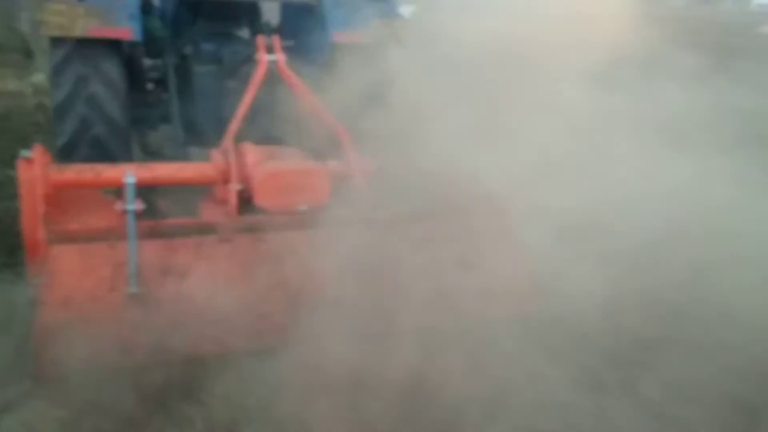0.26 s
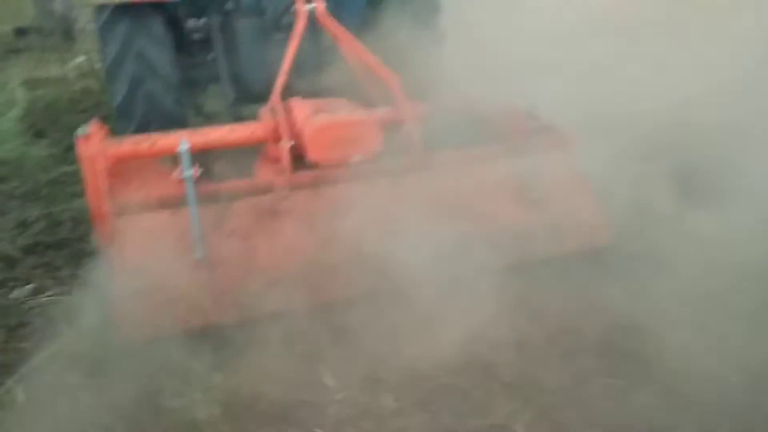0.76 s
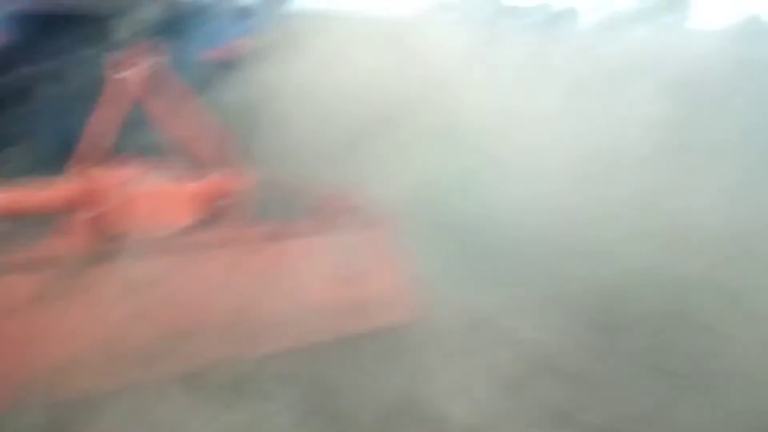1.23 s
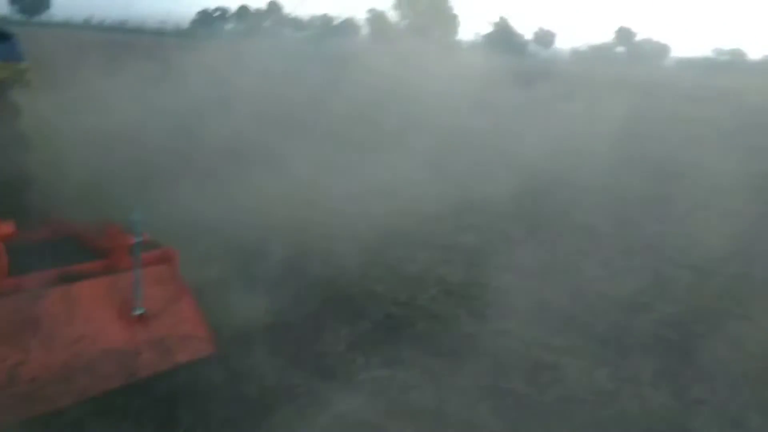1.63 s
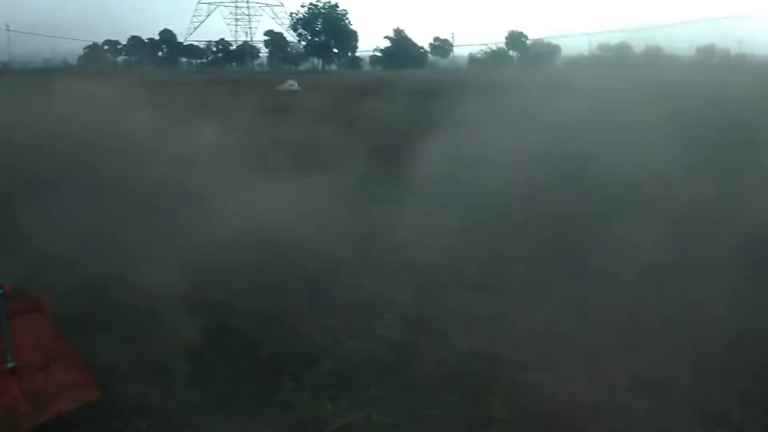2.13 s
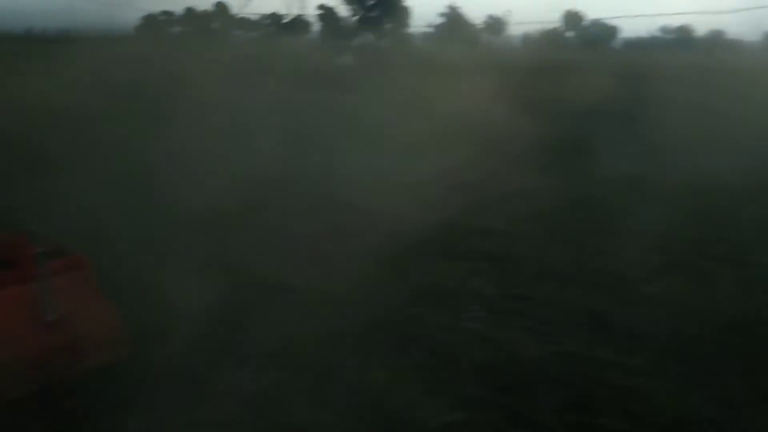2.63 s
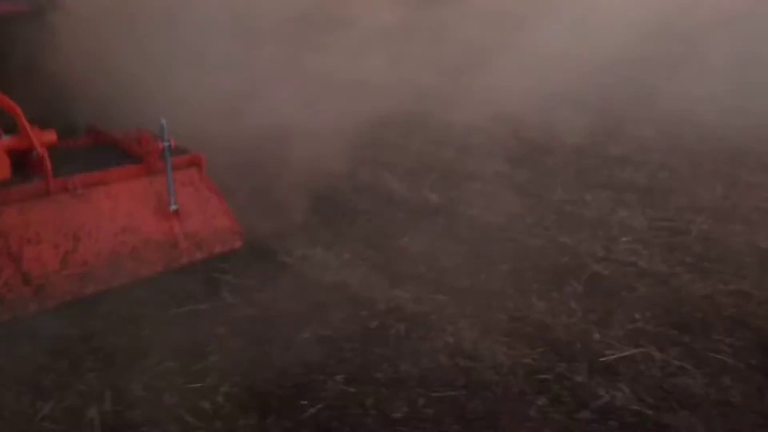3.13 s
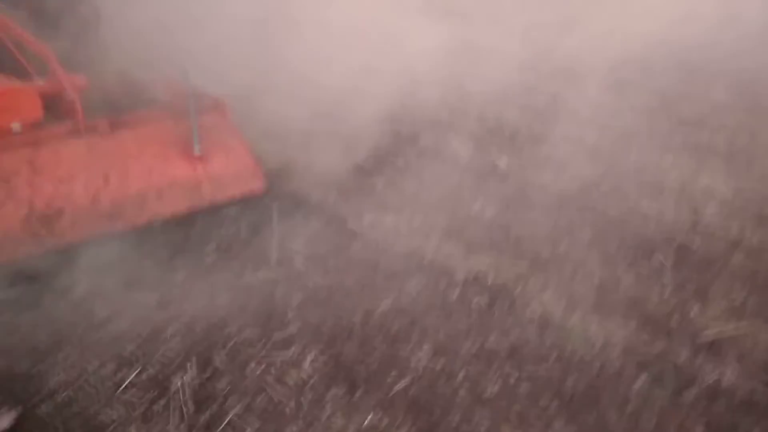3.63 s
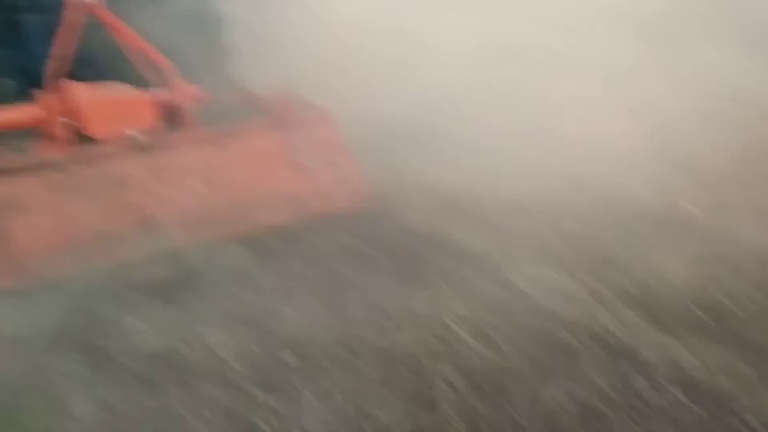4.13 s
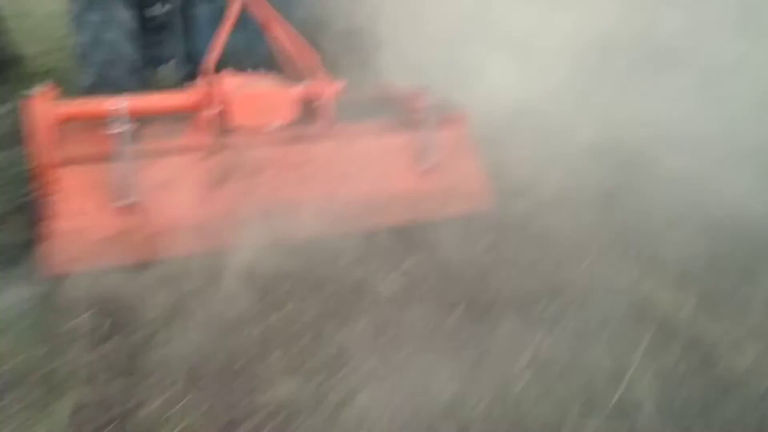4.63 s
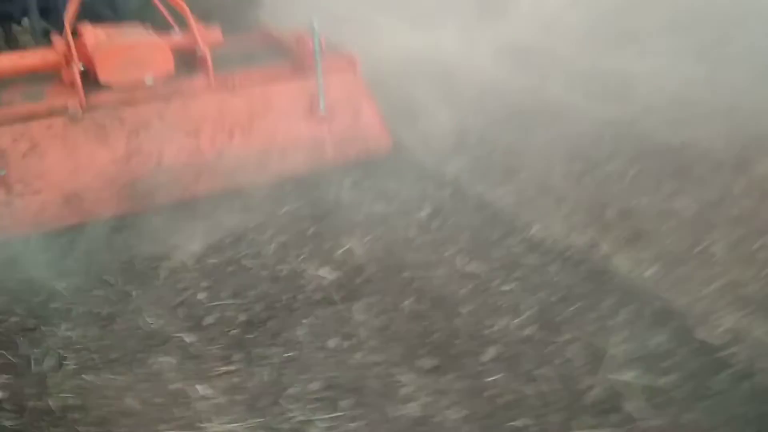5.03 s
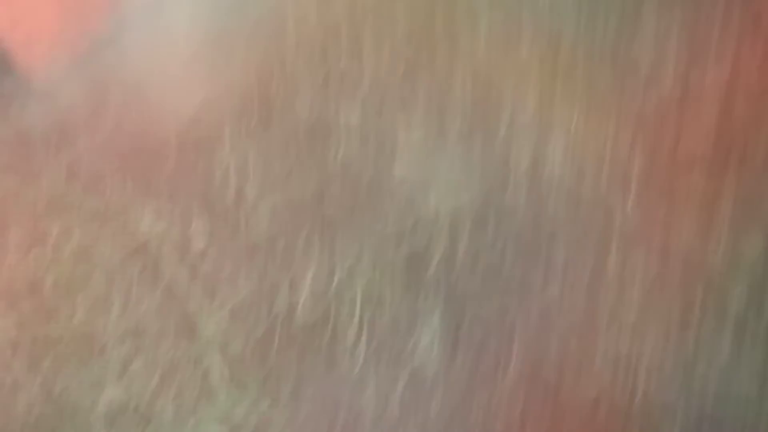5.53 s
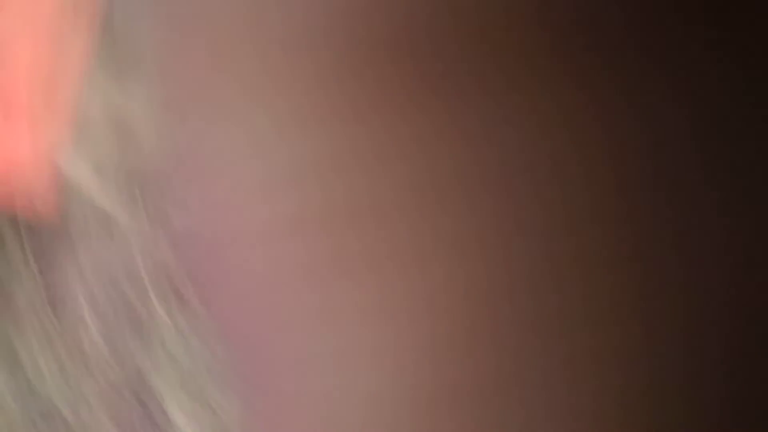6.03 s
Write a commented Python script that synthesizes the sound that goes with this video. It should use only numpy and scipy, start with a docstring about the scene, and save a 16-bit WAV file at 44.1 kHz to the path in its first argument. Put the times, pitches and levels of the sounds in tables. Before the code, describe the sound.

A tractor-drawn tiller works dry soil in an open field, heard from close behind on a wind-exposed stereo phone. Throughout, an uneven low diesel drone lies under rough churning earth, with irregular hissing showers of grit and fine dust. From 0 to 0.7 s the machine is fairly clear, with several clods knocking the steel hood and bright pebble clicks near 0.45 s. Gusts begin around 0.7 s, with more clanks to 1.15 s. From 1.5 to 2.6 s wind hits hardest, mostly left: deep thumps, distorted rumble, flutter and ragged pops, with metallic clanks and snaps at 2.06-2.25, 2.5 and 2.7 s. It dips near 3 s, then buffets again from 3.2 to 4.2 s. Straw rustles left from 4.3 to 5.4 s, amid short gusts near 4.9-5.25 s. Afterwards it is calmer, with dull knocks at 5.3-5.4 s, a bright stone snap at 5.8 s, clicks, and a closing gust at 6.25 s.

```python
"""A tractor's rotary tiller works dry soil in an open, windy field, a phone carried close behind it.
The tines fling bursts of grit and dust noise, pebbles click, and clods and stones ring the steel hood's
resonances. The diesel's uneven firing pulses drone under churning ground, and dry straw rustles close by.
Gusts buffet the two microphone ports, the left one most: filtered noise for the turbulence,
gliding purrs for eddies in step, single swings for big ones and ragged pops for slaps."""
import sys
import numpy as np
from scipy import signal
from scipy.fft import rfft, irfft
from scipy.io import wavfile
from scipy.ndimage import uniform_filter1d, map_coordinates

SR = 44100
rng = np.random.default_rng(int(sys.argv[2]) if len(sys.argv) > 2 else 0)


def transcribe(signal):
    """Save signal, clipped to [-1, 1], as a 16-bit WAV file at the path in sys.argv[1]."""
    frames = np.atleast_2d(signal).T
    limited = np.clip(frames, -1, 1)
    pcm = np.round(limited * 32767).astype(np.int16)
    wavfile.write(sys.argv[1], SR, pcm)


N = 276507

# sharp slaps of wind on the left port: (time [s], level before a 1.5 dB cut [dB])
SLAP_EVENTS = [(0.749, -17.5), (1.301, -17), (1.353, -11), (1.513, -10), (1.531, -16), (1.572, -17),
               (1.608, -8), (1.62, -1.5), (1.636, -2), (1.656, -10), (1.664, -12), (1.677, 3),
               (1.795, -4.5), (1.866, -0.5), (1.885, -9), (1.98, -7), (1.992, -9), (2.275, -12),
               (2.361, -7), (2.39, -9), (2.397, -3.5), (2.409, -11), (2.419, -8), (2.444, -4.5),
               (2.466, -3.5), (2.484, -7), (2.514, -9), (2.578, 0), (2.971, -10), (2.994, -14),
               (3.157, -13.5), (3.239, -17), (3.392, -11.5), (3.539, -7), (3.571, -1), (3.586, -9),
               (3.664, -12), (3.686, -11), (3.809, -0.5), (3.821, -5), (3.831, -6), (3.886, -7.5),
               (3.938, -8), (3.985, -1.5), (4.028, -7), (4.068, -6.5), (4.142, -15), (4.298, -11),
               (4.34, -11), (4.538, -25), (4.662, -16), (4.777, -17), (4.928, -16.5), (4.977, -7.5),
               (5.137, -15.5), (5.157, -10), (5.168, -12), (5.185, -13), (5.227, -10.5)]
# eddy pitch as the phone turns in the wind: flutter, crackle and slaps shift by powers of it,
# and the deep heave grows with it: (time [s], factor [ratio])
EDDY_PITCH_COURSE = [(0, 1), (.8, 0.65), (1.05, 0.86), (1.62, 1.067), (2.3, 1.14), (2.55, 1.146),
                     (2.85, 0.85), (3.2, 0.58), (3.6, .54), (3.9, 0.62), (4.5, .72), (4.97, 0.78),
                     (5.18, 0.65), (5.5, 0.62), (6.27, 1.26)]


def undb(db):
    """Decibels to gain."""
    return 10 ** (np.asarray(db) / 20)


def unit(x):
    """Scale to rms 1."""
    return x / np.sqrt(np.mean(x ** 2) + 1e-18)


def curves(table):
    """The columns of a table, joined by straight lines in time."""
    s, *columns = np.transpose(table)
    t = np.arange(N) / SR
    return [np.interp(t, s, column) for column in columns]


def pan(db):
    """Left and right gains of equal total power, from left minus right in dB."""
    gains = np.array([undb(db / 2), undb(-db / 2)]).reshape(2, -1)
    return gains / np.sqrt(np.mean(gains ** 2, axis=0))


def walk(rate):
    """Random course of rms 1 that takes a new direction rate times a second."""
    places = np.arange(N) / SR * rate
    steps = rng.standard_normal(size=8192)
    return unit(map_coordinates(steps, [places], order=1, mode="wrap"))


def colour(x, spectrum, size=4096):
    """Causal minimum-phase filter with the given spectrum; the result has rms 1."""
    hz, db = np.transpose(spectrum)
    bins = np.maximum(np.fft.rfftfreq(size, 1 / SR), 1)
    gains = undb(np.interp(np.log(bins), np.log(hz), db))
    # folding the cepstrum forward in time makes the filter causal
    cepstrum = irfft(np.log(gains))
    cepstrum[1:size // 2] *= 2
    cepstrum[size // 2 + 1:] = 0
    response = irfft(np.exp(rfft(cepstrum)))
    return unit(signal.oaconvolve(x, response, mode="full")[:N])


def ring(x, modes):
    """Damped resonances driven by x, with alternating signs; the result has rms 1."""
    total = 0
    for k, (hz, width, db) in enumerate(modes):
        resonance = signal.lfilter(*signal.iirpeak(hz, hz / width, SR), x)
        total = total + (-1) ** k * undb(db) * resonance
    return unit(total)


def steady(x, seconds):
    """Even out slow swells and keep the quick texture."""
    size = int(seconds * SR) + 1
    power = uniform_filter1d(uniform_filter1d(x ** 2, size), size)
    return x / np.sqrt(power + 1e-6)


def patchy(x, depth_db, width_hz, seconds, size=1024):
    """Narrow regions of the spectrum swell and sink on their own."""
    hz, t, z = signal.stft(x, SR, nperseg=size)
    places = np.meshgrid(hz / width_hz, t / seconds, indexing="ij")
    steps = rng.standard_normal(size=(128, 256))
    chance = unit(map_coordinates(steps, places, order=1, mode="wrap"))
    return signal.istft(z * unit(undb(depth_db * chance)), SR, nperseg=size)[1][..., :N]


def faster(x, factor):
    """Shift a texture in pitch by a moving factor, as eddies that pass faster or slower."""
    places = np.cumsum(np.clip(factor, .2, 2))
    return map_coordinates(x, [places], order=3, mode="wrap")


def flatten(x, limit, order=4):
    """Leave small swings alone and round those that near the limit."""
    return x / (1 + (x / limit) ** order) ** (1 / order)


def burst(start, length, fall, rise):
    """Envelope of a shower or gust (all in s): a quick rise, a hold, an exponential fall."""
    t = np.arange(SR * .6) / SR
    shape = (1 - np.exp(-t / rise)) * np.exp(-np.maximum(t - length, 0) / fall)
    first = int(np.clip(start * SR, 0, N - 1))
    return slice(first, first + len(t)), shape[:N - first]


def grains(rate, spread_db):
    """Random tiny impacts, rate a second, most small and a few large."""
    present = rng.random(N) < rate / SR
    size_db = spread_db * np.minimum(rng.exponential(size=N), 4)
    return present * rng.choice([-1, 1], N) * undb(size_db)


def soil(spectrum, rate, spread_db, shared):
    """Grain noise at both ports, partly the same (shared is a power fraction) and partly their own."""
    common, left, right = (colour(grains(rate, spread_db), spectrum) for _ in range(3))
    shared = np.clip(shared, 0, 1)
    return np.sqrt(shared) * common + np.sqrt(1 - shared) * np.array([left, right])


def blips(rate, sharpness, count=14):
    """Tiny vortices ringing for a few cycles at set pitches; rate a second at every pitch."""
    total = 0
    for hz in np.geomspace(400, 4400, count):
        ringing = signal.lfilter(*signal.iirpeak(hz, sharpness, SR), grains(rate, spread_db=2.0))
        total = total + np.sqrt(hz) * unit(ringing)
    return total


def tractor():
    """Uneven diesel firings thud in the exhaust while the rotor churns the ground."""
    # spectra of exhaust and churned ground: (frequency [Hz], relative density [dB])
    exhaust = [(20, -20), (50, 23.5), (75, -41), (150, 12.5), (300, -8.5), (650, 6.5), (1200, -15),
               (4000, -60)]
    churn_spectrum = [(20, -11), (60, 12.5), (160, 8.5), (350, -11.5), (650, -2), (1000, -13), (2000, -13),
                      (4000, -17), (7500, -36), (9800, -10.5), (12000, -81), (16000, -78)]
    firing_hz = 50 * (1 + 0.023 * walk(rate=5.5))
    turns = np.cumsum(firing_hz) / SR
    firings = np.diff(np.floor(turns), prepend=0) * undb(1 * walk(rate=24))
    engine = colour(firings, exhaust) * undb(-43.5)
    ground = soil(churn_spectrum, rate=7200, spread_db=5.0, shared=0.48)
    churn = patchy(ground, depth_db=4, width_hz=247, seconds=0.037)
    return (engine + churn * undb(-38.5 + 4.0 * walk(rate=24))) * pan(4.2)


def sprays():
    """The tines fling showers of coarse grit and fine dust over a steady trickle."""
    # showers: (time [s], hold [s], coarse grit level [dB], fine dust level [dB])
    showers = [(.003, 0.0045, -31, -41), (0.111, 0.025, -35, -31), (0.41, 0.023, -42, -37.5),
               (0.443, 0.014, -33, -30.5), (0.48, 0.011, -30.5, -37), (0.684, 0.015, -35.5, -61),
               (0.753, 0.008, -39, -41), (0.871, 0.068, -32, -36), (1.016, 0.032, -35, -31.5),
               (1.141, 0.026, -31.5, -32.5), (1.215, 0.073, -35.5, -44.5), (1.599, 0.089, -40.5, -38),
               (1.654, 0.0081, -36, -37), (1.786, 0.014, -32, -32), (1.852, 0.0056, -37.5, -58),
               (1.959, 0.036, -35, -32.5), (2.039, 0.11, -35.5, -35), (2.213, 0.018, -41, -33),
               (2.257, 0.033, -34, -44), (2.362, 0.005, -39, -40), (2.432, 0.032, -37.5, -36.5),
               (2.527, 0.0079, -38, -32), (2.65, 0.028, -36.5, -57), (2.674, 0.0076, -32.5, -34),
               (2.734, 0.031, -33, -52), (2.806, 0.053, -42, -37), (3.045, 0.013, -30.5, -36.5),
               (3.106, 0.011, -36, -40), (3.331, 0.039, -63, -39.5), (3.403, 0.055, -45, -37.5),
               (3.468, 0.036, -43, -36.5), (3.521, 0.046, -37.5, -47), (3.727, 0.058, -35.5, -43.5),
               (3.968, 0.018, -29.5, -43), (4.003, 0.014, -35, -33.5), (4.081, 0.0069, -35, -46),
               (4.261, 0.029, -36.5, -43), (4.432, 0.026, -38, -33.5), (4.593, 0.017, -34, -30),
               (4.687, 0.034, -62, -34), (4.798, 0.027, -38, -34.5), (4.957, 0.033, -62, -40.5),
               (5.17, 0.11, -46, -32), (5.651, 0.0057, -55, -35), (5.787, 0.0038, -35, -37),
               (6.005, 0.065, -37, -40), (6.183, 0.0077, -37, -40)]
    # trickle of soil between sprays: (time [s], coarse grit level before a 10.5 dB cut [dB])
    trickle = [(0, -35), (1.2, -42.5), (1.5, -39.5), (2.2, -47), (2.9, -35), (3.8, -44.5), (4.3, -35),
               (6.27, -41.5)]
    # the side the soil flies on, as the phone swings: (time [s], left minus right [dB])
    soil_side = [(0, 3.5), (.45, 3.5), (1.1, 6.5), (1.7, 1.5), (2.3, -1), (2.9, -1), (3.5, 0), (4.2, 3.5),
                 (4.6, 12), (5.2, 3), (5.65, 4), (6.05, 9), (6.27, -6)]
    # spectra of grit and dust: (frequency [Hz], relative density [dB])
    grit_spectrum = [(1000, -2.5), (2500, -2), (3800, -6), (4800, -6.5), (5200, 6), (6200, 3), (7600, 1.5),
                     (9000, -2), (12000, -69), (16000, -57)]
    dust_spectrum = [(5000, -10), (7500, -1.5), (8800, 7), (9900, 6.5), (11300, -0.5), (12500, -9),
                     (14000, -55), (16000, -86)]
    coarse_power, fine_power = np.zeros((2, 2, N))
    for s, length, grit_db, dust_db in showers:
        pan_db = np.interp(s, *np.transpose(soil_side))
        span, shape = burst(s, length, fall=0.035, rise=0.0014)
        coarse_power[:, span] += (undb(grit_db) * pan(pan_db) * shape) ** 2
        # the dust lies 6 dB further to the right
        fine_power[:, span] += (undb(dust_db) * pan(pan_db - 6.0) * shape) ** 2
    coarse_power += undb(curves(trickle)[0] - 10.5) ** 2
    clumps = undb(2.43 * walk(rate=110))
    grit = soil(grit_spectrum, rate=9000, spread_db=2.5, shared=0.047)
    dust = soil(dust_spectrum, rate=14000, spread_db=1.0, shared=0.14)
    grit, dust = (patchy(x, depth_db=3, width_hz=300, seconds=.035) for x in (grit, dust))
    coarse = np.sqrt(coarse_power) * steady(grit, seconds=0.028)
    fine = np.sqrt(fine_power) * steady(dust, seconds=0.13)
    return clumps * (coarse + fine)


def straw():
    """Dry stalks rustle close by in a dense, bright crackle, over the faint one of the stubble."""
    # rustles: (time [s], hold [s], level [dB])
    rustles = [(4.306, 0.051, -42.5), (4.431, 0.036, -45), (4.691, 0.1, -34.5), (4.796, 0.051, -38),
               (4.952, 0.077, -42.5), (5.158, 0.21, -31)]
    # spectrum of straw: (frequency [Hz], relative density [dB])
    straw_spectrum = [(3000, -9), (7000, -24.5), (9000, -3.5), (10500, -1), (12500, -6), (14000, -12),
                      (16000, -15)]
    stubble_db, stubble_pan_db, rustle_pan_db = -51.5, 0.5, 9
    force = np.zeros((2, N)) + undb(stubble_db) * pan(stubble_pan_db)
    for s, length, db in rustles:
        span, shape = burst(s, length, fall=0.081, rise=0.0073)
        force[:, span] = np.hypot(force[:, span], undb(db) * pan(rustle_pan_db) * shape)
    rustle = soil(straw_spectrum, rate=7300, spread_db=5.0, shared=0.043)
    rustle = patchy(rustle, depth_db=3, width_hz=300, seconds=.025)
    return steady(rustle, seconds=0.19) * undb(walk(rate=24)) * force


def airflow():
    """Gusts add in power to the breeze and waver; gives five dB courses, in the order of the gust columns."""
    # gusts, levels before waver and layer trims: (time [s], hold [s], left rumble [dB],
    # left flutter [dB], left crackle [dB], right rumble [dB], right flutter [dB])
    gusts = [(0.682, 0.038, -40, -16.5, -38, -15, -31), (0.729, 0.19, -18, -16.5, -37.5, -29, -50),
             (0.795, 0.045, -32, -14.5, -54, -33, -48), (0.952, 0.06, -9.5, -21, -47, -29, -47),
             (1.135, 0.068, -45, -55, -33, -24.5, -55), (1.236, 0.12, -36, -19, -40, -44, -52),
             (1.282, 0.09, -27, -12, -25.5, -18, -38), (1.429, 0.31, -10.5, -22.5, -37, -16.5, -50),
             (1.546, 0.046, 3, -19, -23, -1, -25), (1.598, 0.079, -5.5, -10.5, -14.5, -1, -17),
             (1.677, 0.24, -8.5, -18, -31, -13.5, -41), (1.937, 0.062, -1.5, -10, -18.5, -11, -21.5),
             (2.037, 0.21, -10, -20, -28.5, -19, -43), (2.177, 0.069, -28, -14.5, -32, -30, -38),
             (2.241, 0.11, -7.5, -10.5, -19.5, -10.5, -17.5), (2.345, 0.063, -3.5, -1.5, -13, -14, -40),
             (2.416, 0.16, -4.5, -13, -21.5, -27, -34), (2.622, 0.1, -27, -38, -39, -43, -48),
             (2.75, 0.011, -28, -50, -21.5, -26, -39), (2.776, 0.11, -17, -29, -26, -18.5, -51),
             (2.935, 0.13, -20, -32, -32, -28, -42), (3.143, 0.014, -22, -18, -20, -34, -39),
             (3.223, 0.15, -22, -12.5, -20, -31, -33), (3.34, 0.12, -23, -17, -22, -42, -38),
             (3.475, 0.049, -18, -24, -22.5, -29, -48), (3.513, 0.11, -9.5, -13, -16, -38, -45),
             (3.643, 0.028, -10, -10, -19, -44, -50), (3.68, 0.024, -32, -31, -21, -44, -50),
             (3.74, 0.04, -18, -24, -12.5, -27, -42), (3.796, 0.031, -10, -10.5, -14.5, -12, -32),
             (3.851, 0.022, -20, -8, -16, -22, -38), (3.875, 0.063, -22, -10, -18, -21, -34),
             (3.966, 0.12, -35, -10.5, -16, -25, -29), (4.124, 0.035, -37, -14, -12, -47, -52),
             (4.179, 0.014, -15.5, -18, -44, -47, -50), (4.282, 0.086, -25, -20.5, -26.5, -40, -30.5),
             (4.527, 0.02, -21, -26.5, -30, -47, -48), (4.572, 0.16, -31, -33, -34.5, -47, -42),
             (4.879, 0.0083, -14, -15.5, -32, -46, -44), (4.908, 0.029, -17.5, -25, -33, -44, -44),
             (4.937, 0.058, -26, -16, -18.5, -46, -38), (4.953, 0.026, -20, -13.5, -22.5, -46, -40),
             (5.116, 0.061, -16, -20, -29, -36, -27.5), (5.155, 0.019, -9, -12, -15, -28, -16.5),
             (5.197, 0.025, -28, -15, -17.5, -22, -23), (5.259, 0.011, -44, -36, -43, -38, -21),
             (5.428, 0.057, -42, -31, -46, -19.5, -17), (5.566, 0.026, -50, -25, -37, -48, -47),
             (5.915, 0.047, -23.5, -38, -60, -22.5, -31.5), (6.252, 0.12, -10.5, -20, -20, -25, -53)]
    # light breeze between gusts: (time [s], level before its make-up [dB])
    breeze = [(0, -35.5), (0.6, -38.5), (1.1, -32), (2.2, -36), (3.2, -30.5), (4.4, -32.5), (5.4, -31.5),
              (6.27, -37)]
    # make-up of the breeze relative to its level: (left rumble [dB], left flutter [dB],
    # left crackle [dB], right rumble [dB], right flutter [dB])
    breeze_mix_db = [-2.5, -2.5, -15, -7, -11.5]
    waver_db, wavers_per_s = 3, 26
    power = undb(curves(breeze)[0] + np.array(breeze_mix_db)[:, None]) ** 2
    for s, length, *levels_db in gusts:
        span, shape = burst(s, length, fall=0.026, rise=0.0092)
        power[:, span] += np.outer(undb(levels_db), shape) ** 2
    large, small, right = (walk(wavers_per_s) for _ in range(3))
    return 10 * np.log10(power) + waver_db * np.array([large, small, small, right, right])


def port_wind(rumble_db, flutter_db, crackle_db, eddies):
    """Large eddies heave a port until its swing flattens; small ones come in packets, the finest tear off."""
    # spectra, those of flutter and crackle before pitch shifts: (frequency [Hz], relative density [dB])
    rumble_spectrum = [(20, -28), (45, -1), (72, -1), (130, -3.5), (200, -7.5), (300, -25), (600, -30.5),
                       (1500, -96.5)]
    heave_spectrum = [(8, -12), (22, -6.5), (40, 0), (60, -5), (110, -17), (400, -101)]
    flutter_spectrum = [(70, -51), (160, -4), (270, 0), (460, -7), (600, -9.5), (800, -17), (1300, -37.5),
                        (3000, -95.5)]
    crackle_spectrum = [(400, -32), (750, 4.5), (1100, 3), (1650, 4), (2400, -0.5), (3200, -10.5),
                        (4400, -17), (9000, -17)]
    port_limit = 0.71  # pressure at which a port's swing flattens [full scale]
    pitch = np.abs(curves(EDDY_PITCH_COURSE)[0])
    # deep heave relative to the rumble: more with fast eddies, less in a hard gust
    heave_db = -4.5 + 19 * np.log2(pitch) - 0.32 * rumble_db
    packets = walk(rate=110)
    rumble = colour(rng.standard_normal(N) * undb(3.36 * packets), rumble_spectrum)
    rumble = steady(rumble, seconds=0.047)
    heave = steady(colour(rng.standard_normal(N), heave_spectrum), seconds=0.15)
    large = (rumble + undb(heave_db) * heave) / np.hypot(1, undb(heave_db))

    wander = 2 ** (.16 * walk(rate=26))  # pitch drift, .16 octave rms
    flutter = colour(grains(rate=1500, spread_db=3.0), flutter_spectrum)
    flutter = faster(flutter, .93 * wander * pitch ** .3) * undb(5.4 * packets)
    flutter = patchy(flutter, depth_db=3.5, width_hz=103.3, seconds=.025)
    flutter = steady(flutter, seconds=0.024)
    swing = large * undb(rumble_db + 0.5) + flutter * undb(flutter_db - 1.0) + eddies

    crackle = colour(blips(rate=110, sharpness=8.3), crackle_spectrum)
    crackle = faster(crackle, pitch ** 1.2 * wander ** .5)
    free = 1 / (1 + (swing / port_limit) ** 2) ** 0.76  # a flattened port passes little crackle
    crackle = steady(crackle * free * undb(2.5 * packets), seconds=0.026)
    return flatten(swing, port_limit) + crackle * undb(crackle_db - 5.0)


def wind():
    """Each port sits in its own turbulence; the right one, more sheltered, crackles faintly with its flutter."""
    rumble_db, flutter_db, crackle_db, right_rumble_db, right_flutter_db = airflow()
    lull_db = lulls()
    purr, purring = whirls()
    thump, thumping = thumps()
    order_db = -5  # how far random buffeting sinks while a whirl or thump holds the port
    rumble_db = rumble_db + order_db * np.maximum(purring, thumping)
    flutter_db = flutter_db + order_db * purring + 1.2 * lull_db
    left = port_wind(rumble_db, flutter_db, crackle_db + lull_db, purr + thump) + slaps()
    right_crackle_db = 0.55 * right_flutter_db - 31.0
    right = port_wind(right_rumble_db, right_flutter_db, right_crackle_db, 0)
    return np.array([left, right])


def knocks():
    """A clod or stone hits the hood: a tick, scattered pieces clank its edges, and broad panels boom."""
    # blows: (time [s], clank level [dB], panel boom relative to it [dB], left minus right [dB],
    # scatter time [s], most favoured clank pitch [Hz])
    blows = [(0.266, -35.5, 3, 6, 0.022, 1100), (0.346, -27.5, -14, 5, 0.0061, 1440),
             (0.365, -37.5, -3, 3, 0.034, 1270), (0.405, -45, 13.5, 5, 0.031, 1300),
             (0.45, -26.5, 11, 1, 0.015, 1360), (.49, -32.5, 4.5, 5, 0.014, 1470),
             (0.693, -40, -15, 20, 0.018, 2070), (.874, -32, 8, 9, 0.012, 1360),
             (0.902, -26.5, -17, 4, 0.022, 1330), (1.021, -28.5, -28, 6, 0.0037, 2210),
             (1.146, -26, -4, -1, 0.0026, 2090), (1.966, -28.5, -4, -21, 0.0079, 1350),
             (2.061, -19, -20, 8, 0.015, 2370), (2.225, -28, -4, 8, 0.023, 2450),
             (2.522, -21.5, -8, 9, 0.012, 2460), (2.678, -26, -15, 7, 0.013, 2550),
             (2.754, -35.5, 9, 33, 0.016, 2400), (2.814, -32, 6.5, 6, 0.0082, 2040),
             (4.014, -26, 2, 3, 0.0098, 3500), (4.281, -39, 9.5, 10, 0.021, 3770),
             (4.593, -36.5, -15, -1, 0.0067, 2800), (5.309, -43.5, 10.5, -7, 0.048, 1896),
             (5.426, -31, 13.5, 0, 0.0096, 2477), (6.013, -36, 5, -3, 0.0091, 1290),
             (6.184, -45, -24, 12, 0.003, 3006)]
    # resonances of the hood's panels and edges: (frequency [Hz], width [Hz], relative level [dB])
    panel_modes = [(537, 78, 0), (623, 120, 0.5), (699, 68, 4.5), (810, 80, -1.5)]
    edge_modes = [(970, 110, 2), (1280, 93, 5), (1560, 600, 4), (2104, 77, 17), (2540, 220, 13.5),
                  (3020, 260, -5), (3920, 340, 5)]
    edge, panel, tick = np.zeros((len(edge_modes), 2, N)), np.zeros((2, N)), np.zeros((2, N))
    mode_hz, _, mode_db = np.transpose(edge_modes)
    for s, db, boom_db, pan_db, scatter, clank_hz in blows:
        # the place of contact favours the modes near one pitch
        shares = undb(mode_db - 44 * np.abs(np.log2(mode_hz / clank_hz)))
        shares = shares / np.linalg.norm(shares)
        span, shape = burst(s, scatter, fall=0.01, rise=0.00024)
        edge[:, :, span] += shares[:, None, None] * (undb(db) * pan(pan_db) * shape)
        span, shape = burst(s, scatter, fall=0.0069, rise=0.0022)
        panel[:, span] += undb(db + boom_db) * pan(pan_db) * shape
        span, shape = burst(s, length=0.015, fall=0.0015, rise=0.00036)
        tick[:, span] += undb(db - 14.0) * pan(pan_db / 2) * shape
    # spectra of small pieces and heavy lumps: (frequency [Hz], relative density [dB])
    piece_spectrum = [(400, -11), (1000, 12.0), (7000, 5.0), (11000, 1.0), (16000, -27)]
    lump_spectrum = [(150, -21), (450, 6.5), (850, 0.5), (1600, -16.0)]
    pieces = soil(piece_spectrum, rate=2300, spread_db=1.0, shared=0.22)
    lumps = soil(lump_spectrum, rate=1800, spread_db=5.0, shared=0.96)
    clank = 0
    for force, mode in zip(edge, edge_modes):
        clank = clank + force * steady(ring(pieces, [mode]), seconds=0.012)
    boom = steady(ring(lumps, panel_modes), seconds=0.032)
    return clank + panel * boom + tick * pieces


def pebbles():
    """A pebble meets a tine: a hard, bright click that is over at once."""
    # clicks: (time [s], level [dB], left minus right [dB])
    clicks = [(0.453, -22.5, -3), (0.491, -25, 7), (.702, -45, 9), (.9, -34, 7), (1.023, -22, 5),
              (1.143, -28, -1), (1.221, -42, 6), (1.24, -47, -2), (1.679, -39, 7), (1.975, -43, -4),
              (2.064, -39, 2), (2.368, -29.5, 2), (2.447, -33, -2), (2.681, -27, -8), (2.815, -54, 0),
              (3.102, -38, -2), (3.743, -26.5, 1), (4.018, -31, 6), (4.277, -26.5, 4), (4.6, -33, 1),
              (4.845, -35.5, 9), (6.184, -27.5, 4)]
    # spectrum of a click: (frequency [Hz], relative density [dB])
    click_spectrum = [(1500, -23), (3000, 2), (5300, 5), (7500, -4), (9500, 3), (11500, -4), (16000, -17)]
    force = np.zeros((2, N))
    for s, db, pan_db in clicks:
        span, shape = burst(s, length=0.0019, fall=0.0045, rise=0.00014)
        force[:, span] += undb(db) * pan(pan_db) * shape
    texture = soil(click_spectrum, rate=1700, spread_db=2.0, shared=0.093)
    return force * steady(texture, seconds=0.011)


def whirls():
    """Eddies shed in step purr and glide at the left port; gives pressure and hold on the port (0-1)."""
    # purrs, pitches before a random wander: (time [s], length [s], start [Hz], end [Hz], level [dB])
    purrs = [(0.69, 0.026, 416, 450, -22.5), (0.767, 0.022, 169, 200, -16), (0.807, .02, 330, 260, -15.5),
             (.826, 0.039, 132, 151, -11.5), (.913, 0.021, 253, 272, -19.5), (1.295, 0.02, 260, 360, -13.5),
             (1.553, 0.04, 193, 140, -5.5), (1.954, .075, 44.7, 105, -2), (2.187, 0.03, 194, 324, -10.5),
             (2.271, .028, 271, 380, -12.5), (2.545, 0.023, 490, 550, -11.5),
             (2.967, 0.029, 188, 184, -10.5), (2.998, 0.021, 200, 160, -12.5),
             (3.152, 0.019, 203, 257, -10.5), (3.24, 0.058, 188.7, 263, -11.5),
             (3.55, 0.035, 280.3, 165, -10), (3.59, 0.044, 100.3, 116, -3.5), (3.64, 0.026, 202, 332, -17),
             (3.677, .032, 488, 885.6, -25.5), (3.746, 0.024, 988, 590, -20),
             (3.799, 0.015, 216, 224, -7.5), (3.84, 0.052, 55.5, 417.3, -9.5),
             (3.994, .052, 159.6, 368, -6.5), (4.334, 0.027, 334, 282, -19),
             (4.974, 0.037, 167, 214, -12.5), (5.159, 0.031, 147, 189, -6.5), (5.218, 0.017, 180, 188, -11),
             (6.239, 0.018, 422, 523, -17)]
    out, hold = np.zeros((2, N))
    wander = 2 ** (0.15 * walk(rate=180))  # octaves
    waver = undb(2.5 * walk(rate=160))
    for (s, length, start_hz, end_hz, db), turn in zip(purrs, rng.random(len(purrs))):
        span = np.arange(int(s * SR), min(int((s + length) * SR), N))
        hz = np.geomspace(start_hz, end_hz, len(span)) * wander[span]
        phase = 2 * np.pi * (turn + np.cumsum(hz) / SR)
        shape = signal.windows.tukey(len(span), .5)
        wave = np.sin(phase) + 0.14 * np.sin(2 * phase)  # the octave skews the swing
        out[span] += np.sqrt(2) * undb(db) * shape * unit(waver[span]) * wave
        hold[span] += shape
    return out, np.minimum(hold, 1)


def lulls():
    """The flow clings smoothly to the port just before each slap's vortex breaks: a dip in dB."""
    t = np.arange(N) / SR
    dips = 0
    for s, db in SLAP_EVENTS:
        dips = dips + np.interp(t, s + np.array([-.035, -.018, -.002, .002]), [0, 1, 1, 0])
    return -1.5 * np.minimum(dips, 1)


def slaps():
    """A vortex breaks right on the left port: a short, ragged pop."""
    # spectrum of a slap before its pitch shift: (frequency [Hz], relative density [dB])
    slap_spectrum = [(50, -17), (130, 2), (280, 4), (550, 4), (1100, -5.5), (2000, -10), (3000, -20),
                     (4000, -29.5), (7000, -61.5)]
    force = np.zeros(N)
    for s, db in SLAP_EVENTS:
        span, shape = burst(s, length=0.0005, fall=0.0037, rise=0.00053)
        force[span] += undb(db) * shape
    pitch = np.abs(curves(EDDY_PITCH_COURSE)[0])
    texture = faster(colour(rng.standard_normal(N), slap_spectrum), pitch ** .55)
    return undb(-1.5) * force * steady(texture, seconds=0.01)


def thumps():
    """One big eddy pushes and pulls the left port; gives pressure and hold on the port (0-1)."""
    # swings, each at a random phase: (centre time [s], pitch [Hz], envelope peak [dB])
    swings = [(0.968, 50, -7.5), (1.015, 74.6, -2), (1.45, 36, -7), (1.597, 49.3, 0.5), (1.72, 47.78, -1),
              (1.835, 63.6, 1), (1.884, 77, 2), (2.141, 63.5, -4), (2.21, 86, -4), (2.33, 70, -1),
              (2.454, 33, -8), (2.769, 51.4, -2.5), (2.885, 80, -16), (3.053, 89.18, -9.5),
              (3.359, 34.8, -7), (3.431, 101, -0.5), (3.462, 101, -7.5), (3.82, 40, -5),
              (3.962, 74.6, -7.5), (4.045, 32, -12.5), (4.309, 59.3, -11), (4.935, 75, -9),
              (5.13, 71.03, -12), (5.184, 100.2, -5), (5.819, 41.5, -13), (6.22, 60, -13)]
    out, hold = np.zeros((2, N))
    for (s, hz, db), turn in zip(swings, rng.random(len(swings))):
        span = np.arange(int((s - 2 / hz) * SR), min(int((s + 2 / hz) * SR), N))
        cycles = (span / SR - s) * hz
        shape = np.exp(-.5 * (cycles / 0.5) ** 2)  # bell with a spread of half a cycle
        out[span] += undb(db) * shape * np.sin(2 * np.pi * (cycles + turn))
        hold[span] += shape
    return out, np.minimum(hold, 1)


def snaps():
    """A stone snaps off the hood's rim: a bright, dry burst of its resonances."""
    # hits: (time [s], level [dB], left minus right [dB])
    hits = [(2.126, -24.5, 22), (2.229, -22.5, 17), (5.794, -24.5, 15)]
    # resonances of the rim: (frequency [Hz], width [Hz], relative level [dB])
    rim_modes = [(1140, 38, -5), (2110, 240, 2), (2280, 125, -4.5), (3000, 450, -9)]
    force = np.zeros((2, N))
    for s, db, pan_db in hits:
        span, shape = burst(s, length=0.0031, fall=0.0032, rise=0.00032)
        force[:, span] += undb(db) * pan(pan_db) * shape
    return force * steady(ring(rng.standard_normal(N), rim_modes), seconds=.005)


def scene():
    """The machine, its soil and the straw, a little later at the left port, heard through the wind."""
    left, right = tractor() + sprays() + straw() + knocks() + pebbles() + snaps()
    port_lag_s = 0.000226
    t = np.arange(N) / SR
    return np.array([np.interp(t - port_lag_s, t, left), right]) + wind()


def record(dry):
    """The phone rounds the hardest peaks and cuts the top above 15.5 kHz."""
    rounded = flatten(dry, .9, order=8)
    top_cut = signal.ellip(10, .2, 80, 15500, fs=SR, output="sos")
    return signal.sosfilt(top_cut, rounded)


dry = scene()
out = record(dry)
transcribe(out)
```